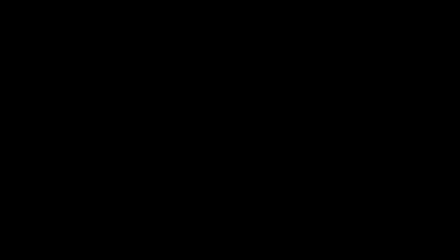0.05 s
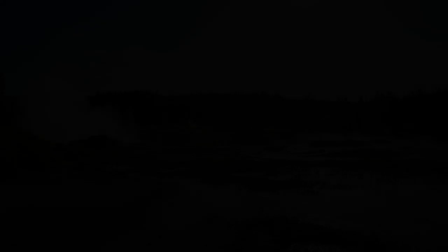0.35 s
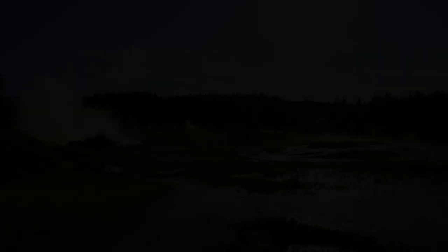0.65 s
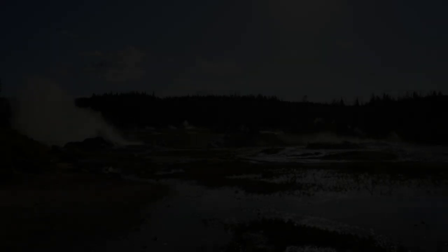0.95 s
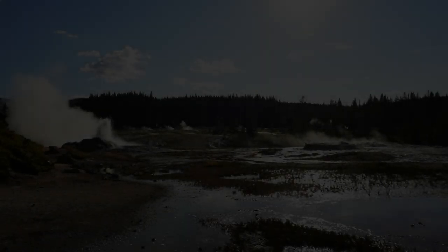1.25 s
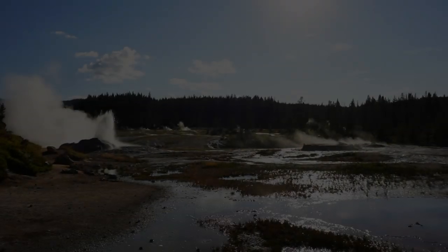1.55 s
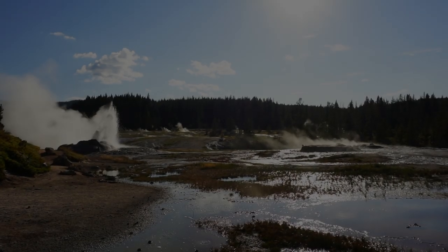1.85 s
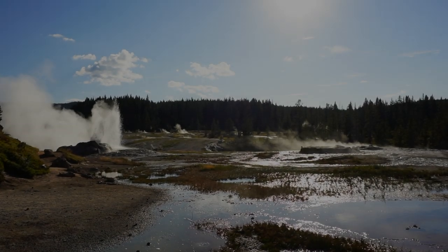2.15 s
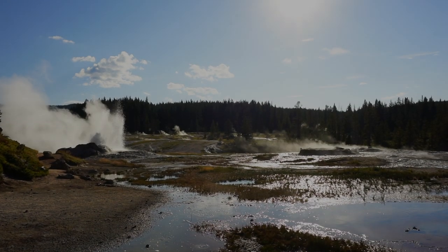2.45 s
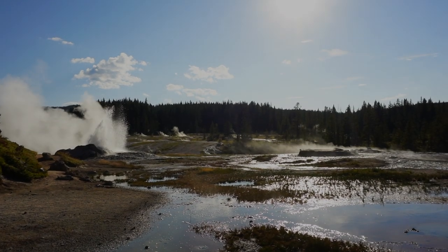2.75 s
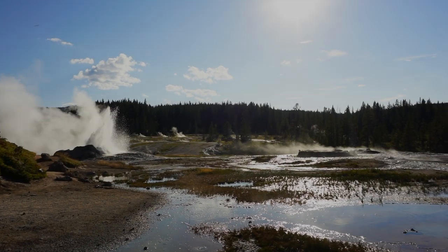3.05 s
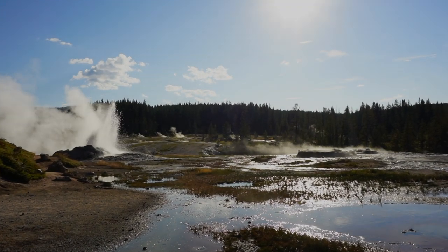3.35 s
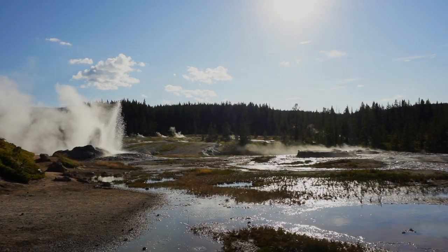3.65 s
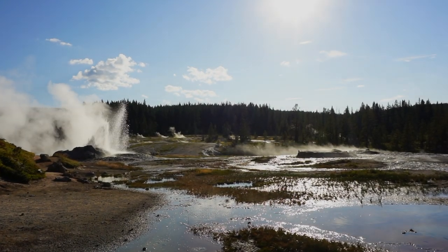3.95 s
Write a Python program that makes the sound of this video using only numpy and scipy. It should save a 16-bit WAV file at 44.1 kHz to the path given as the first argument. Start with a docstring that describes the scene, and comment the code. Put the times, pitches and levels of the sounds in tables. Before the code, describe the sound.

A distant geyser spouts outdoors, its rushing hiss and falling water swelling and sinking several times. Brief sharp splats hit the rock over a hollow, bubbling roar, in stereo and leaning a little to the left.

```python
"""Geyser on a wet rock flat

A distant geyser fades in. Each surge throws up hissing spray and drops splashing water,
and a few slugs of water slap the rock. Underneath, the boiling vent churns, roars and
gurgles with ringing bubbles. Reflections off the ground near the two microphones give
the hiss a fixed, hollow colour."""
import sys
import numpy as np
from scipy import signal
from scipy.fft import rfft, irfft
from scipy.io import wavfile
from scipy.ndimage import uniform_filter1d, map_coordinates

SR = 44100
rng = np.random.default_rng(int(sys.argv[2]) if len(sys.argv) > 2 else 0)


def pcm_store(signal):
    """Save signal as 16-bit PCM."""
    levels = np.round(np.clip(np.atleast_2d(signal), -1, 1) * 32767)
    wavfile.write(sys.argv[1], SR, levels.astype(np.int16).T)


N = 176400

# How the fountain swells and sinks: t/s, splash level/dB, spray level/dB
SURGES = [(0.1, -4, -9), (0.3, -8, -13), (0.5, -13, -10.5), (0.58, -11.5, -10.5), (0.65, -8, -8),
          (0.78, -6.5, -4.5), (0.86, -8, -6.5), (1.0, -6, -3.7), (1.1, -5.5, -2.5), (1.2, -3.5, -3),
          (1.33, -3, -3), (1.5, -3.7, -3.5), (1.7, -7, -4.5), (1.82, -8.5, -6), (1.93, -13.5, -6.5),
          (2.07, -11, -8), (2.17, -9, -6), (2.38, -8.5, -6.5), (2.52, -3, -2), (2.6, -2.5, -2.2),
          (2.66, -0.2, -.6), (2.75, -0.1, -.5), (2.84, -4, -2), (2.93, -6.5, -4.5), (3.1, -10, -6.5),
          (3.3, -8, -5.3), (3.55, -6.5, -3.5), (3.85, -2.6, -1), (4.0, -3, -1.5)]
# Tone colour of the falling water and of the fine spray: f/Hz, level/dB
SPLASH_SPECTRUM = [(60, -128), (150, -94), (300, -77), (550, -68.5), (790, -64.5), (960, -67), (1100, -66),
                   (1420, -67), (1680, -69.5), (2350, -68), (3600, -74), (5500, -85.5), (12000, -105)]
SPRAY_SPECTRUM = [(500, -100), (2000, -83), (3600, -73.5), (5500, -73), (7200, -76), (9000, -76),
                  (10800, -77.5), (12500, -83), (15500, -94.5)]
# Water slapping the rock: t/s, pulse level/dB, centre f/Hz, width/octaves, spatter level/dB, decay/s
ROCK_SLAPS = [(.628, -42, 4000, .4, -53, .012), (.768, -37, 1900, 1.1, -46.5, .015),
              (.845, -37, 4300, .7, -49, .005), (1.166, -37, 3000, 0.9, -46, .006),
              (1.174, -37, 8450, .55, -45, 0.0073), (1.2452, -29, 6500, 0.87, -54, .003),
              (1.5095, -32, 8500, .7, -55, .003), (1.548, -42, 7500, .3, -51, .004),
              (1.5572, -37, 8000, .3, -49, 0.0046), (1.5618, -34, 3900, .3, -44.5, .003),
              (1.601, -40, 8000, .22, -50.5, .005), (2.4695, -32, 2700, 1.1, -50, .008),
              (2.652, -30, 1400, .8, -46, 0.014), (2.678, -34, 2200, .7, -48, .008),
              (2.69, -32, 5000, .5, -42, .006), (2.7333, -28.5, 1480, 0.61, -41, 0.0078),
              (2.745, -39, 7800, .3, -50, .003), (2.768, -35, 1760, 0.49, -46.5, .01),
              (3.4242, -24, 3300, .95, -57, .002), (3.9838, -30, 4030, .9, -50, .005)]
# How hard the vent boils: t/s, churn level/dB, roar level/dB
VENT_ACTIVITY = [(.15, 1, 1), (.45, 1, -10), (.6, 2, -4), (.75, -5, -2.5), (.9, 1, -1.5), (1.05, -1.5, -3),
                 (1.35, -2, -0.5), (1.6, -1.5, .5), (1.8, 3, 0), (2.0, 0, -1), (2.4, 0, -2),
                 (2.55, 0.5, 0.5), (2.67, 1, 1.5), (2.8, 0.5, -0.5), (2.92, 2.5, -1), (3.05, 0, 0.5),
                 (3.19, -1.5, 1), (3.28, 1, 3.5), (3.44, -3.5, 2.5), (3.65, 1.5, -2), (3.8, 0.5, -0.5),
                 (4.0, -1, 1.5)]
# Tone colour of the vent's deep churn and of its hollow roar: f/Hz, level/dB
CHURN_SPECTRUM = [(25, -103), (50, -112), (90, -100), (130, -88), (180, -78.5), (270, -72.5), (370, -71.5),
                  (520, -74), (800, -79), (1600, -84.5), (3500, -105), (9000, -115)]
ROAR_SPECTRUM = [(150, -125), (400, -96), (580, -71), (700, -69), (800, -68), (880, -74), (990, -83),
                 (1120, -77), (1500, -92), (4000, -115)]
# The largest bubbles: t/s, level/dB, f/Hz, ring time/cycles, pitch glide/fraction per ring time
BIG_GURGLES = [(.868, -46, 286, 5, 0.054), (2.295, -41, 730, 11, 0.033), (2.622, -39, 756, 14, -0.057),
               (2.77, -45, 258, 6, -0.045), (2.895, -43, 253, 4.4, .1), (2.92, -41, 603, 7, 0.036),
               (2.945, -39, 720, 6, 0.025), (3.138, -39.5, 499, 9.7, .04), (3.925, -47, 305, 7.7, 0.052)]
# Reflections off the ground: delay/ms, gain, centre f/Hz, width/octaves
GROUND_ECHOES = [(2.16, 0.19, 1750, 0.51), (1.837, -0.21, 2660, 0.28), (1.208, -0.29, 4350, 0.72),
                 (1.122, 0.32, 9200, 0.92)]
# How much of the sound both microphones share: f/Hz, share of the power (0 to 1)
DIRECT_SHARE = [(130, 1), (500, 0.96), (1500, 0.9), (2200, 0.91), (3500, 0.99), (6500, 0.64), (8300, 0.53),
                (10500, 0.85), (12500, 0.59), (15000, .52)]
# How much louder the left side is than the right: f/Hz, level/dB
LEFT_BALANCE = [(300, -0.5), (1500, 1.3), (2800, -1), (4400, 1), (5400, 5.5), (7100, 2.5), (8500, 5.5),
                (11000, -0.5), (15000, 1.5)]
# How far the wave on the left runs ahead of the right: f/Hz, phase/radians
LEFT_LEAD = [(100, 0), (1200, 0.27), (2400, 0.44), (3200, 0.98), (4100, 0.81), (5200, 1.16), (6200, 0.78),
             (7300, 0.54), (9400, 0.14), (11200, 0.12), (12600, .65), (15000, .15)]

TIMES, FREQS = np.arange(N) / SR, np.fft.rfftfreq(N, 1 / SR)


def fountain():
    """Falling water splashes and fine spray hisses; both swell with each surge."""
    when, splash_db, spray_db = np.transpose(SURGES)
    splash = water_noise(SPLASH_SPECTRUM, patch_db=1.13, flicker_db=0.1, drop_share=0.4, size=(6, 7))
    spray = water_noise(SPRAY_SPECTRUM, patch_db=0.69, flicker_db=0.35, drop_share=0.34, size=(16, 6))
    splash *= gain(np.interp(TIMES, when, splash_db))
    spray *= gain(np.interp(TIMES, when, spray_db) - 1)
    return splash + spray


def slaps(top_hz=11500, length=4096):
    """Each slap is one sharp pressure pulse, then a brief spatter of droplets in the same band."""
    out = np.zeros(N)
    age, freqs = np.arange(length) / SR, np.fft.rfftfreq(length, 1 / SR)
    air = 1 / (1 + (freqs / top_hz) ** 12)  # distance dulls the treble
    for start, pulse_db, hz, octaves, spatter_db, decay_s in ROCK_SLAPS:
        band = air * bell_curve(freqs, hz, octaves)
        pulse = np.fft.fftshift(irfft(band))
        add(out, start - pulse.argmax() / SR, gain(pulse_db) * pulse / pulse.max())
        droplets = unit_rms(irfft(rfft(rng.standard_normal(length)) * band))
        add(out, start, gain(spatter_db) * droplets * np.exp(-age / decay_s))
    return out


def vent(bubbles_per_s=30, low_hz=260, high_hz=904):
    """Boiling water churns and roars in the hollow vent, with many small bubbles and a few big ones."""
    when, churn_db, roar_db = np.transpose(VENT_ACTIVITY)
    churn = water_noise(CHURN_SPECTRUM, patch_db=1.5, flicker_db=0.4, drop_share=0, size=(2, 10))
    roar = water_noise(ROAR_SPECTRUM, patch_db=1.2, flicker_db=0.5, drop_share=0.32, size=(2, 7))
    out = churn * gain(np.interp(TIMES, when, churn_db) - 0.5)
    out += slosh(roar) * gain(np.interp(TIMES, when, roar_db) + 0.5)
    direct = out[0]  # bubbles join the direct sound only
    for moment, pitch, faintness in rng.random((int(bubbles_per_s * N / SR), 3)):
        hz = low_hz * (high_hz / low_hz) ** pitch
        level_db = -61.5 - 3 * np.log(faintness + 0.023)  # most are quiet, a few stand out
        add(direct, moment * N / SR, bubble(level_db, hz, ring_cycles=7.3, glide=0.052))
    for start, *gurgle in BIG_GURGLES:
        add(direct, start, bubble(*gurgle))
    return out


def bubble(level_db, hz, ring_cycles, glide, onset_cycles=3):
    """One bubble rings, gliding a little in pitch as it dies away."""
    cycles = hz * np.arange(SR // 5) / SR
    age = cycles / ring_cycles
    onset = 1 - np.exp(-(cycles / onset_cycles) ** 2)
    tone = np.sin(2 * np.pi * cycles * (1 + glide * age / 2))
    return gain(level_db) * tone * np.exp(-age) * onset


def slosh(roar, depth=0.025, wander_s=0.08):
    """The water level in the vent rises and falls, so the pitch of its roar wanders."""
    speed = 1 + depth * smooth_random((1, N), size=(1, int(wander_s * SR)))[0]
    return np.array([map_coordinates(row, [np.cumsum(speed)], order=3, mode="mirror") for row in roar])


def water_noise(spectrum, patch_db, flicker_db, drop_share, size, drops_per_s=2400):
    """Noise and drop impacts that come in clumps. Rows: direct, scattered left, scattered right."""
    drop_db = 3 * np.minimum(rng.exponential(1, N), 5)
    impacts = gain(drop_db) * rng.choice([-1, 1], N)
    drops = unit_rms(impacts * (rng.random(N) < drops_per_s / SR))
    noise = rng.standard_normal((3, N))
    noise[0] = np.sqrt(1 - drop_share) * noise[0] + np.sqrt(drop_share) * drops
    # Cut the sound into a grid of pitch and time, and make some spots louder than others.
    grid = signal.stft(noise, nperseg=512, noverlap=384)[2]
    patches = patch_db * smooth_random(grid.shape[1:], size)
    flicker = flicker_db * smooth_random((1, grid.shape[2]), size=(1, 9))  # all pitches together
    clumpy = signal.istft(grid * gain(patches + flicker), nperseg=512, noverlap=384)[1][:, :N]
    return irfft(rfft(unit_rms(clumpy)) * gain(curve(spectrum)), N) * np.sqrt(SR / 20)


def ground(sound):
    """Short echoes off the ground boost some pitches and cancel others, which sounds hollow."""
    echoes = sum(strength * bell_curve(FREQS, hz, octaves) * np.exp(-2j * np.pi * FREQS * ms / 1000)
                 for ms, strength, hz, octaves in GROUND_ECHOES)
    return irfft(rfft(sound) * (1 + echoes), N)


def microphones(direct, scattered):
    """The direct sound comes from the left; the scattered sound differs between the two sides."""
    side = np.array([[0.5], [-0.5]])  # left, right
    share = curve(DIRECT_SHARE)
    shared = np.sqrt(share) * rfft(direct) * np.exp(1j * side * curve(LEFT_LEAD))
    separate = np.sqrt(1 - share) * rfft(scattered)
    return irfft((shared + separate) * gain(side * curve(LEFT_BALANCE)), N)


def gain(db):
    """Turns decibels into a number to multiply by."""
    return 10 ** (np.asarray(db) / 20)


def unit_rms(x):
    """Scales a signal so its typical size (rms) is 1."""
    return x / np.sqrt(np.mean(x ** 2) + 1e-20)


def curve(table):
    """Joins a table's points to give a value at every frequency, on a log axis."""
    hz, value = np.transpose(table)
    return np.interp(np.log(FREQS + 1), np.log(hz + 1), value)


def bell_curve(freqs, centre_hz, octaves):
    """A band of pitches, strongest at its centre."""
    return np.exp(-(np.log2((freqs + 1) / centre_hz) / octaves) ** 2)


def smooth_random(shape, size):
    """Smooth random ups and downs; size is their width in (pitch steps, time steps)."""
    field = rng.standard_normal(shape)
    for axis in (0, 1, 0, 1):
        field = uniform_filter1d(field, size[axis], axis)
    return unit_rms(field)


def add(mix, start_s, sound):
    """Mixes a sound in at its start time."""
    part = mix[max(round(start_s * SR), 0):][:len(sound)]
    part += sound[:len(part)]


def scene():
    """The vent, the fountain and the slaps, heard in stereo across the flat."""
    water = vent() + fountain()
    stereo_water = microphones(direct=ground(water[0]), scattered=water[1:])
    return stereo_water + ground(slaps()) * gain([[1], [-1]])  # slaps sit a little to the left


def record(dry, low_cut_hz=77, top_hz=15750, fade_start_s=0.033, fade_s=0.51):
    """A wind filter cuts the deep bass, the sound fades in, and the highest treble is removed."""
    wind_filter = signal.butter(2, low_cut_hz, "highpass", fs=SR, output="sos")
    fade = np.clip((TIMES - fade_start_s) / fade_s, 0, 1)
    treble_cut = signal.firwin(511, top_hz, window=("kaiser", 9), fs=SR)
    return signal.oaconvolve(signal.sosfilt(wind_filter, dry) * fade, treble_cut[None], "same")


dry = scene()
out = record(dry)
pcm_store(out)
```